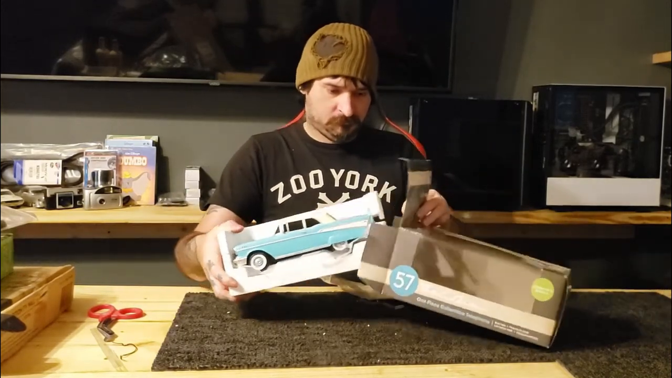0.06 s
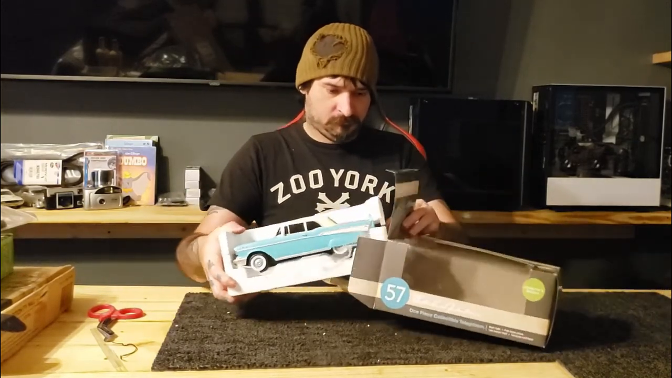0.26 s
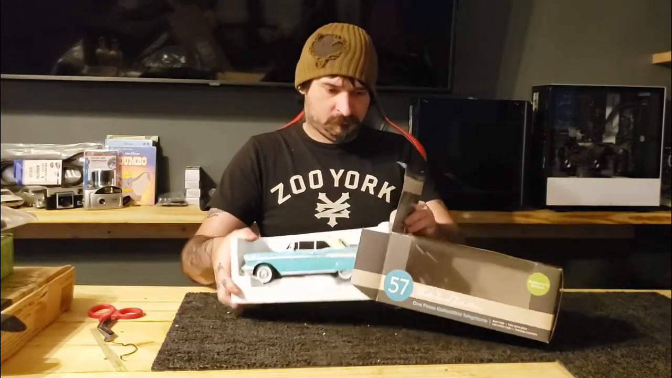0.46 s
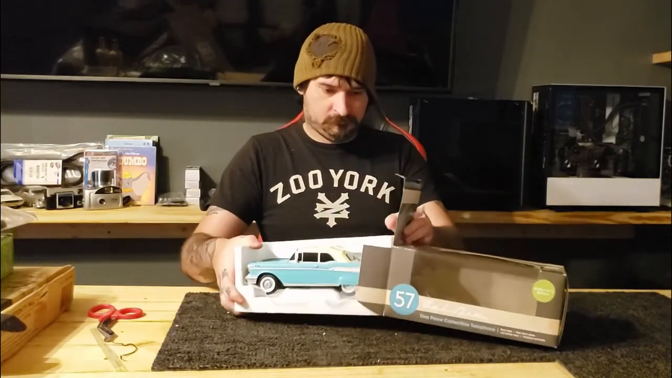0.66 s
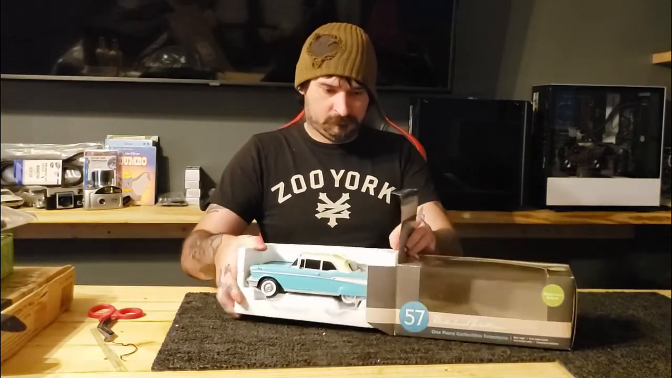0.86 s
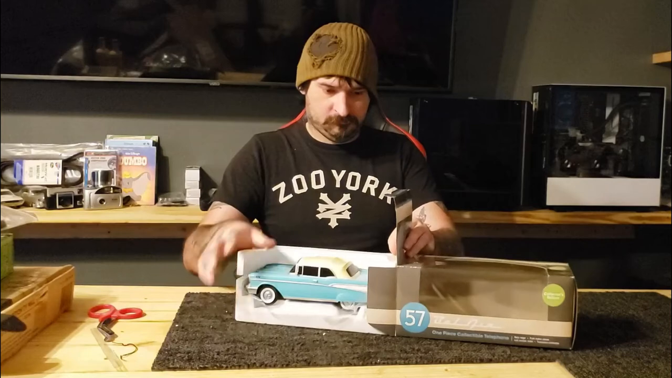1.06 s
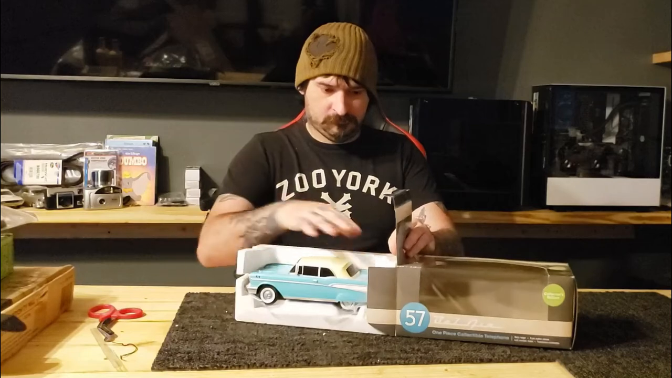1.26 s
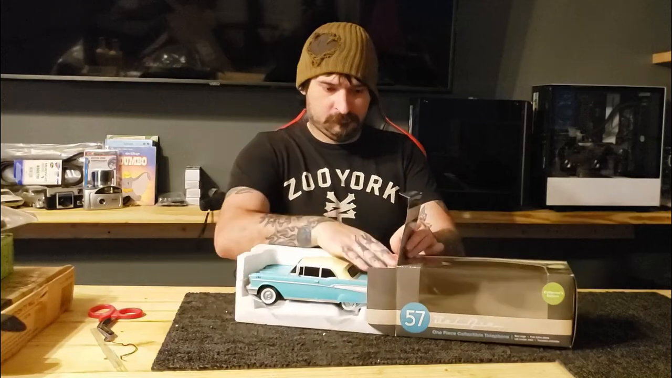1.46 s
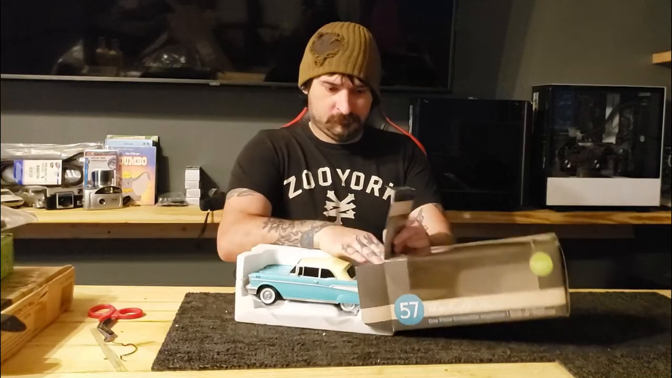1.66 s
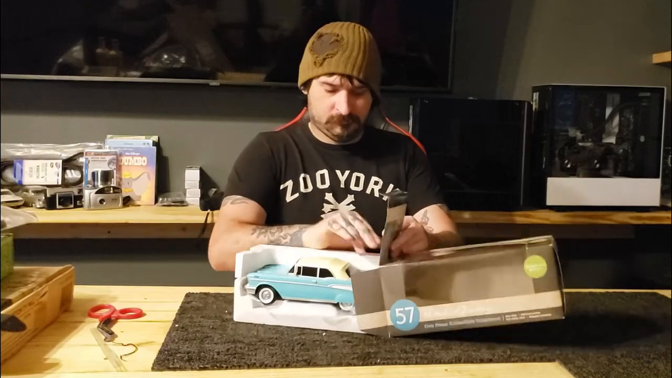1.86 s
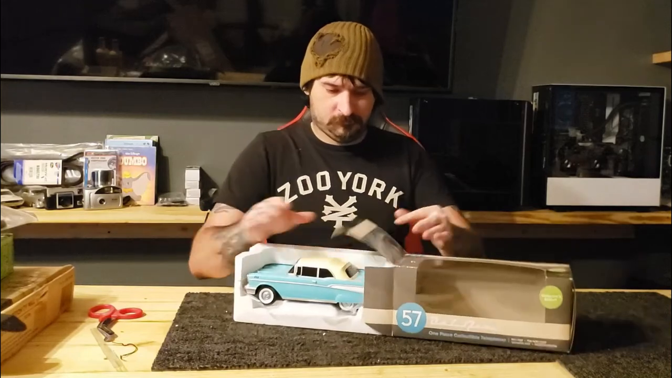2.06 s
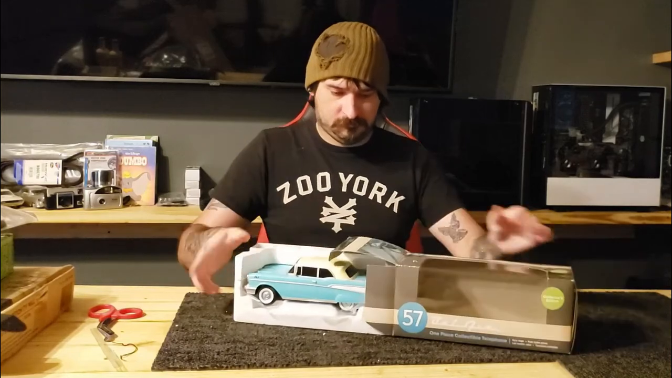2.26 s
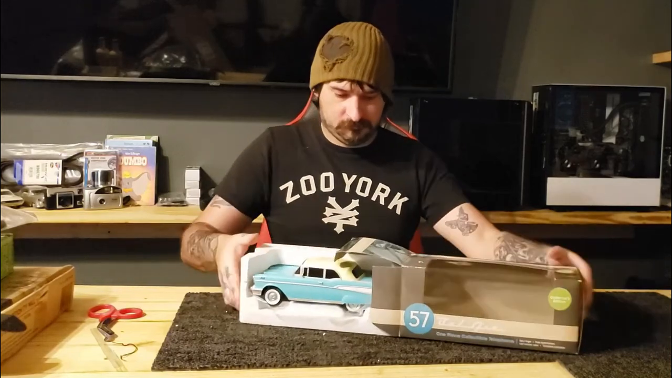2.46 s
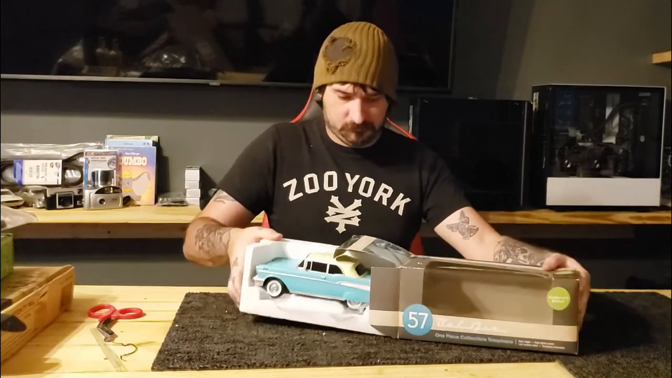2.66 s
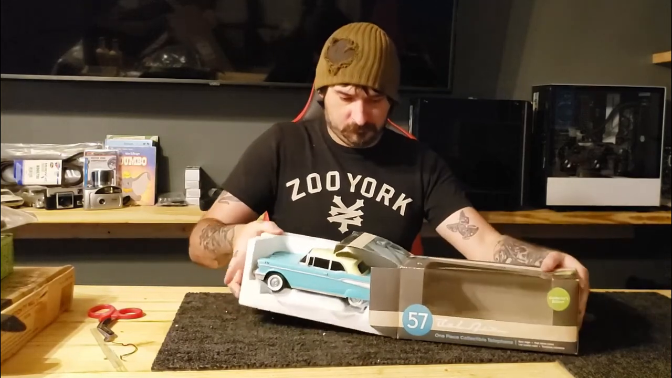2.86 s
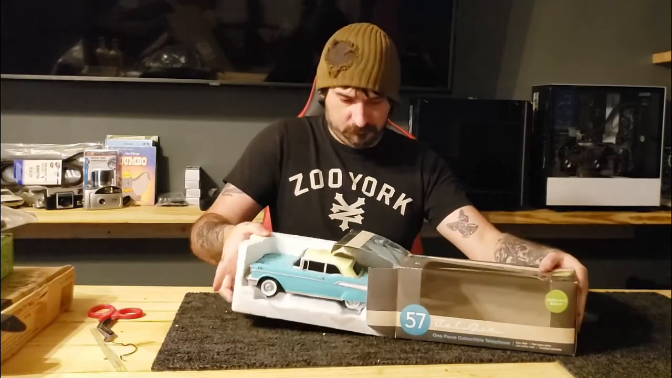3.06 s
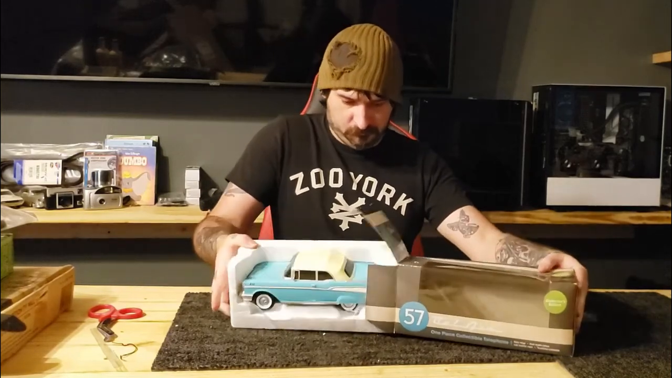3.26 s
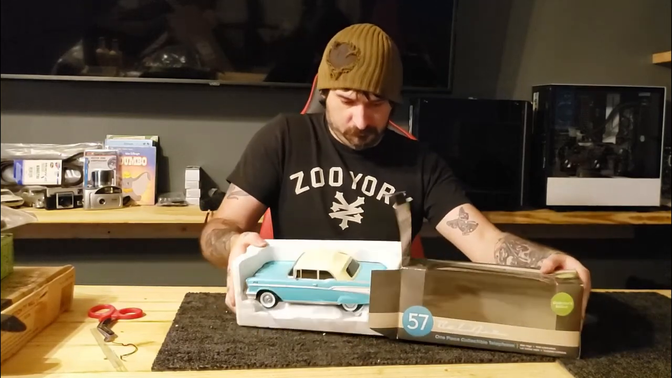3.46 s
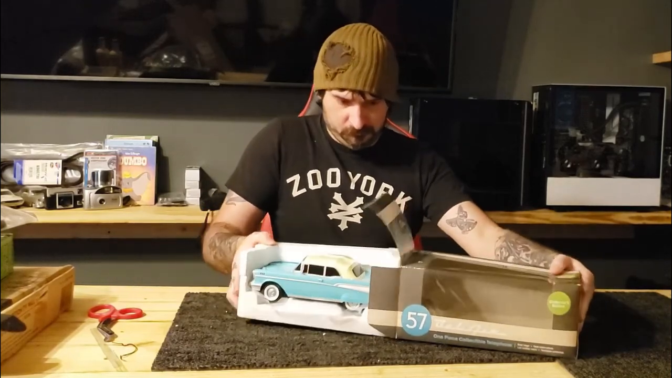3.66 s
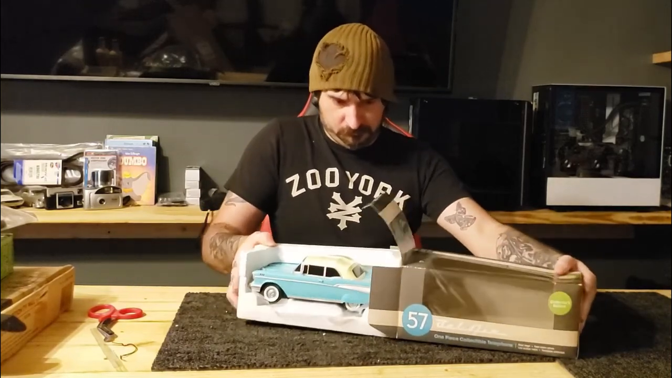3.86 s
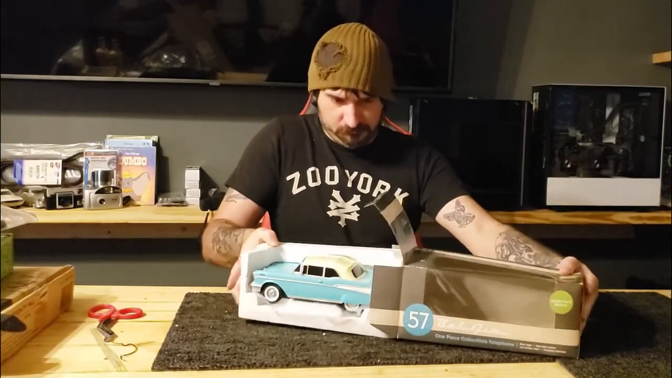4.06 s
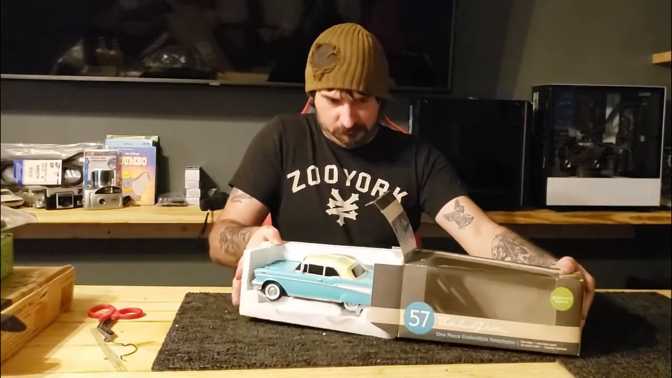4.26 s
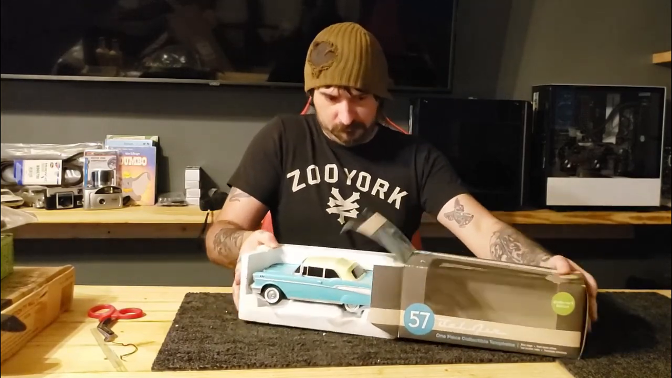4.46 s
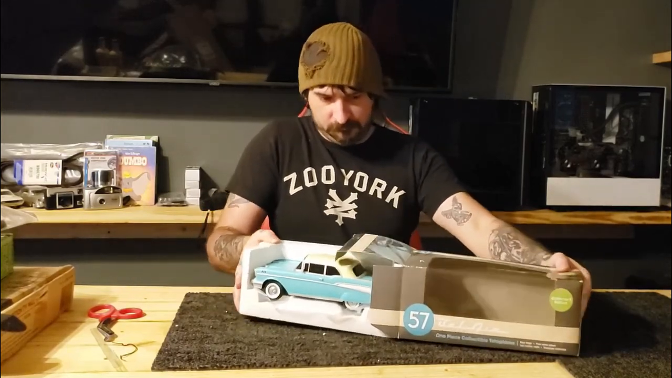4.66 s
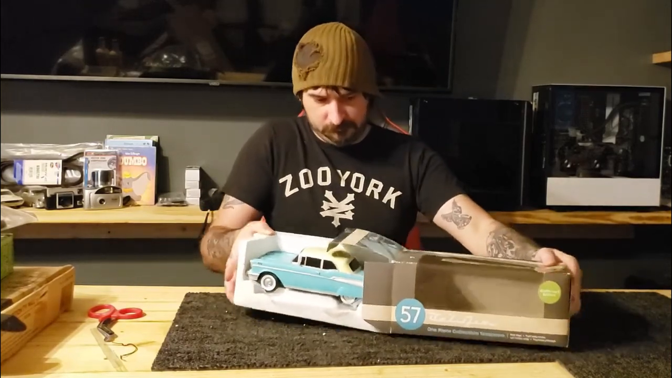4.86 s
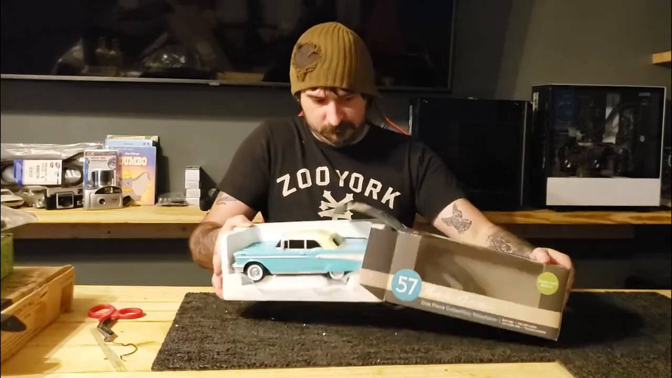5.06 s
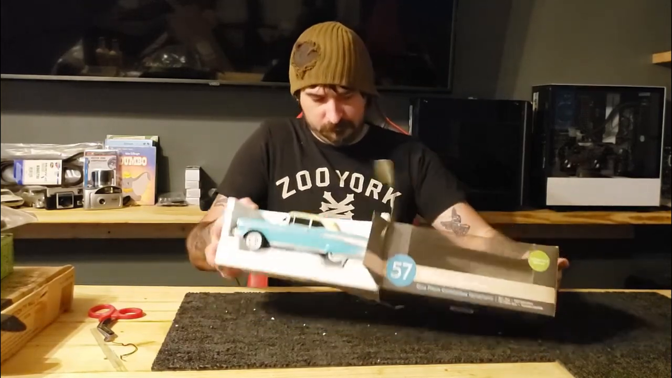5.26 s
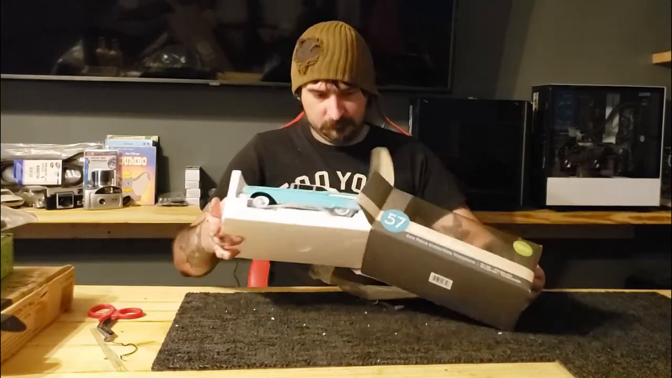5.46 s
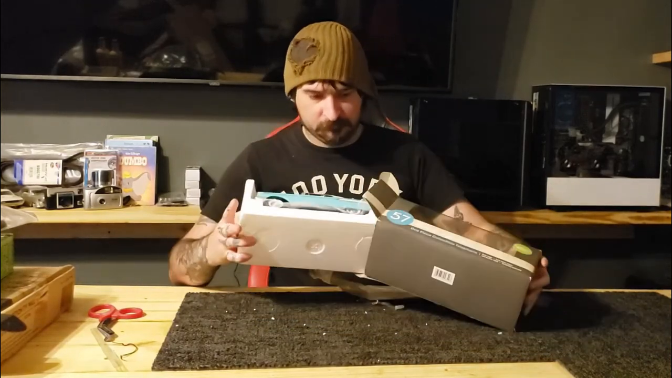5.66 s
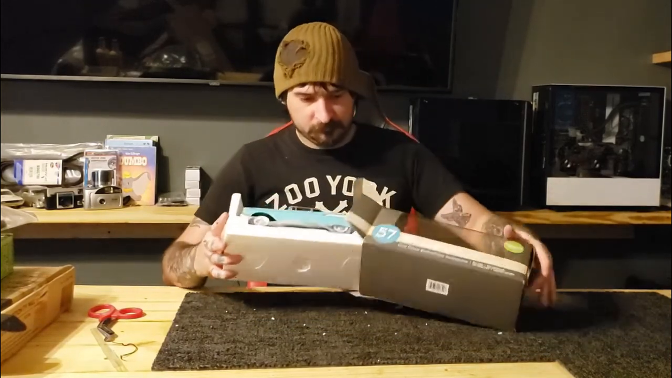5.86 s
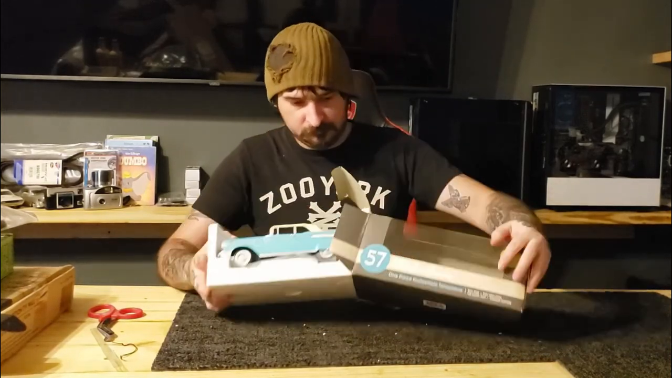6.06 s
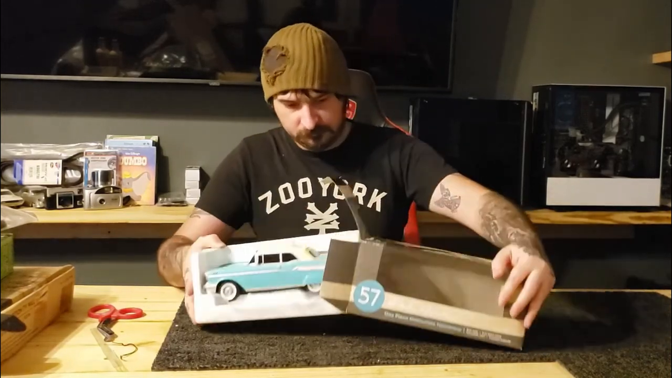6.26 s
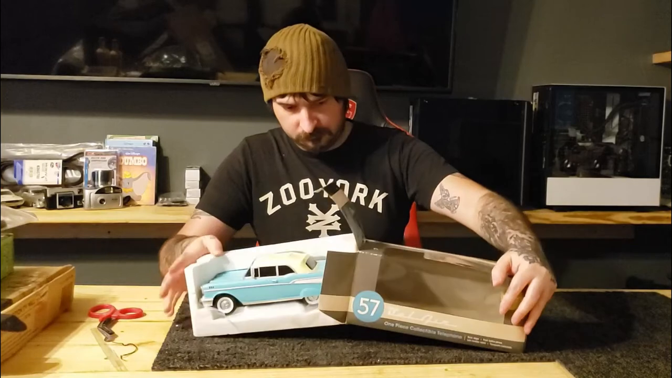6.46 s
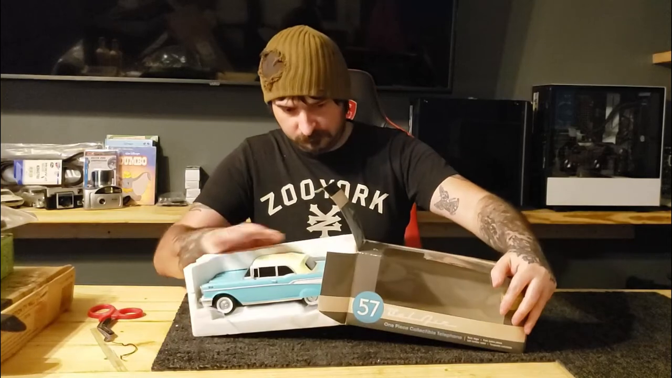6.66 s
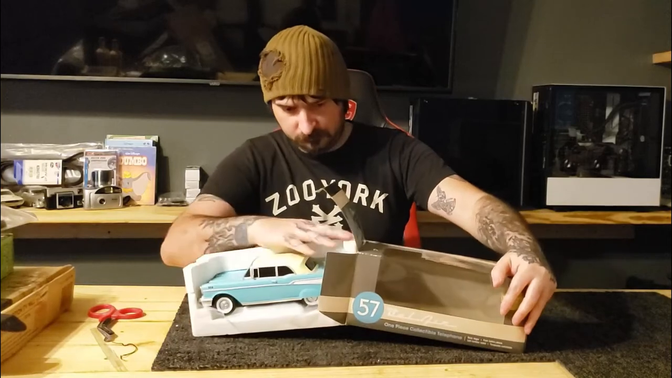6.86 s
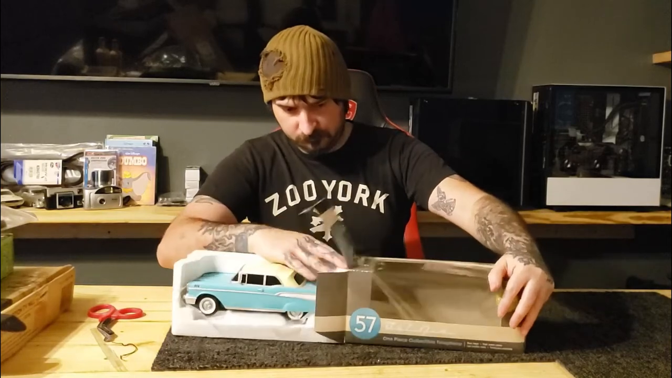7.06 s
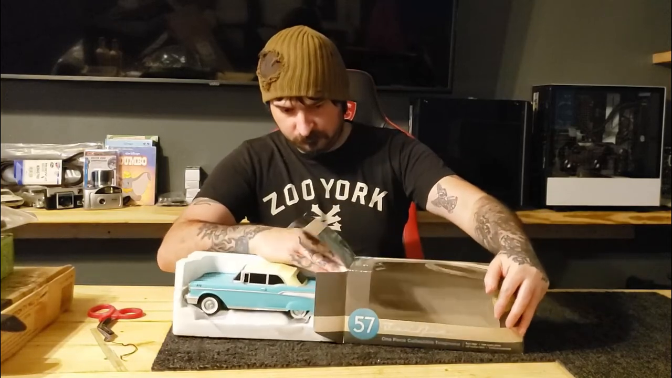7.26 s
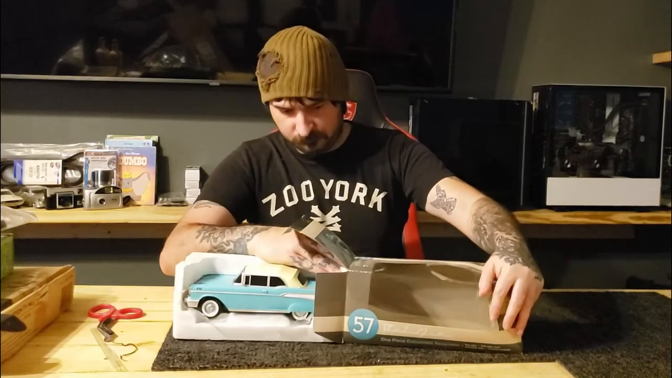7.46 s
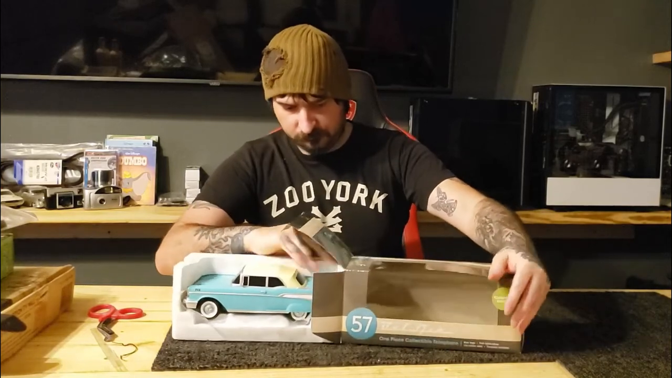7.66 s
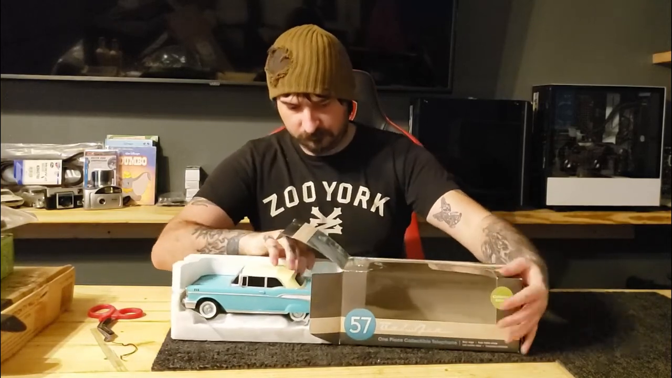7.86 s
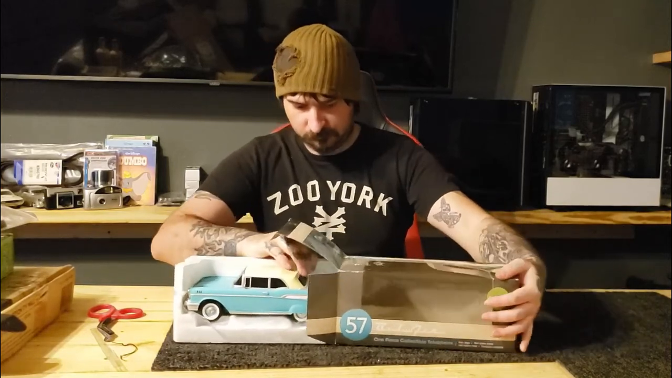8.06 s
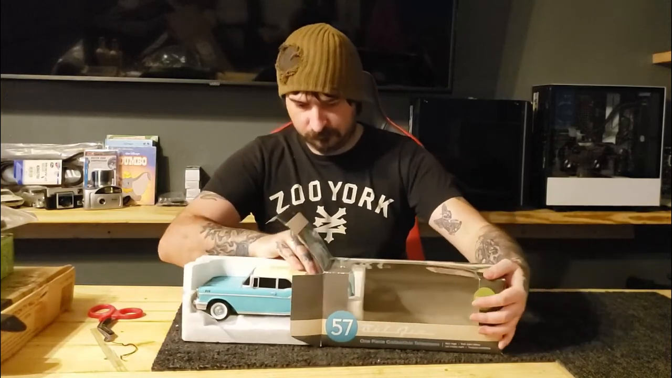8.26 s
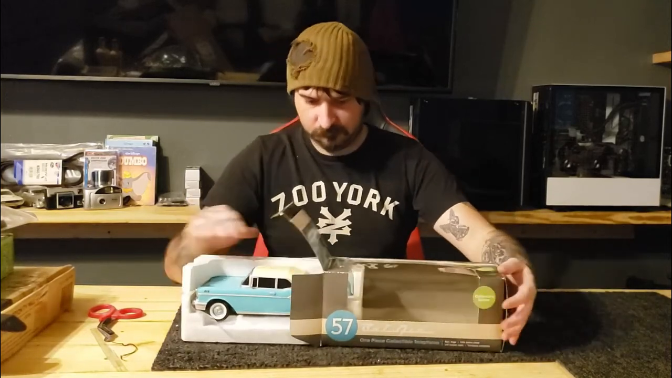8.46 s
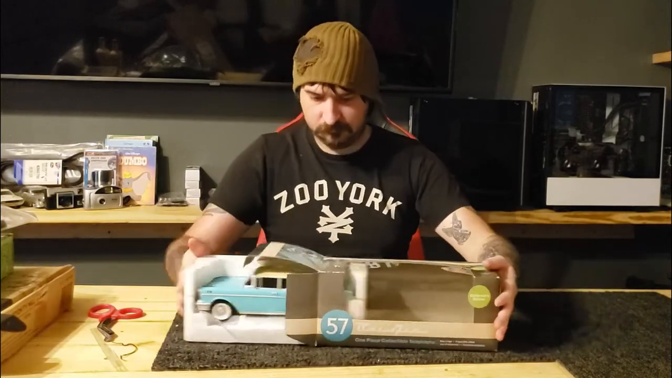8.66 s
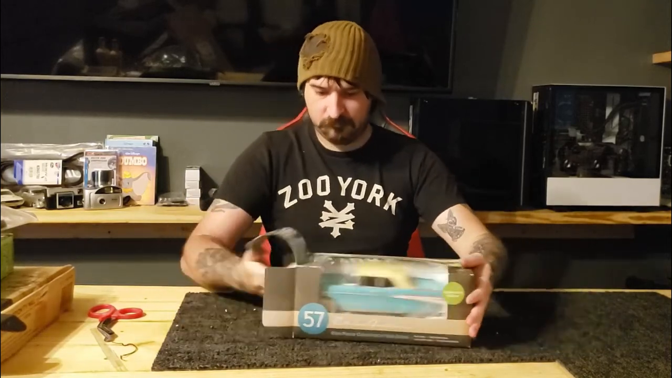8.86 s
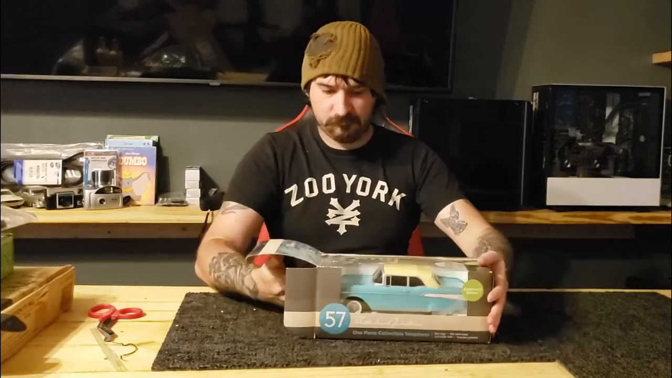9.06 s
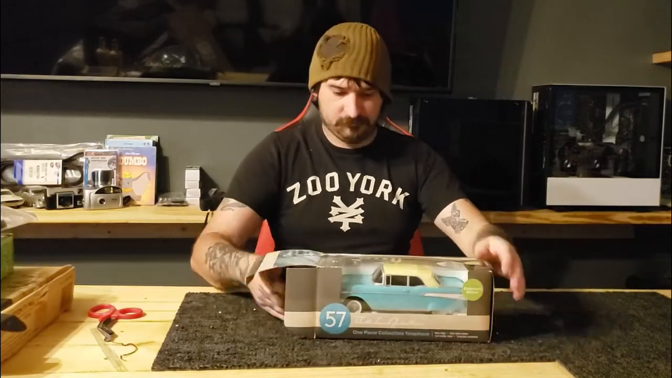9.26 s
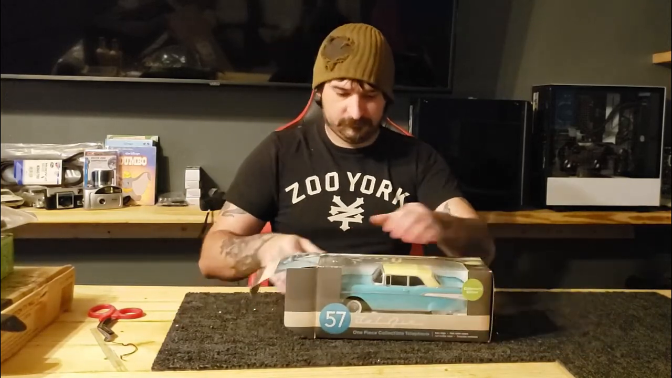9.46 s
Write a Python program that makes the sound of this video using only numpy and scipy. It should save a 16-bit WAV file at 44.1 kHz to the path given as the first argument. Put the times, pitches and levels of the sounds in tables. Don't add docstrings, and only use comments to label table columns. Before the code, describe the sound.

A close stereo pickup in a small hard room, with soft mains hum and low ventilation throughout. From 0 to 1.5 s, hands brush card and foam, with a light knock at 0.15, faint ticks and gentle dragging. Around 1.6 to 2.3 s the box jolts: hollow knocks, a dull card crunch and a low boom at 2.1. A firm dull tap lands at 2.9, then scrapes and small squeaks until 3.8, with taps near 3.9 and 4.2. At 4.6 a flap slaps sharply; at 5.25 several hollow thuds, then rustling and scraping, quieter around 6 to 7. From 7.1 to 7.8 come knocks, booms, crunches and short drags. A bright slap at 8.35 precedes a quick rasping slide from 8.7, climaxing in the loudest crunching knocks at 8.9 to 9.1. A squeaky tap at 9.15, then it settles to hum.

```python
import sys
import numpy as np
from scipy import signal
from scipy.fft import rfft, irfft, next_fast_len
from scipy.io import wavfile
from scipy.ndimage import uniform_filter1d

SR = 44100
rng = np.random.default_rng(int(sys.argv[2]) if len(sys.argv) > 2 else 0)


def volts_from_decibels(level):
    exponent = np.asarray(level, float) / 20
    return 10 ** exponent


def transcribe(signal):
    frames = np.atleast_2d(signal).T
    limited = np.clip(frames, -1, 1)
    pcm = np.round(limited * 32767).astype(np.int16)
    wavfile.write(sys.argv[1], SR, pcm)


N = 419391
CARD_TOP_HZ = 2710

# frequency [Hz], level [dB per Hz].
BRUSH_SPECTRUM = [(2500, 5.5), (3500, 2), (5000, 3), (7000, 3.5), (8500, -4), (11000, -1.5), (15800, -25.5)]
# frequency [Hz], level [dB per Hz].
FIZZ_SPECTRUM = [(6000, -41.5), (8500, -7.5), (9800, 2.5), (11500, 5), (14000, 1), (15800, -1.5)]


def evened(x):
    return x / np.sqrt(np.mean(x ** 2) + 1e-20)


def read(points, hz):
    f, value = np.transpose(points)
    return np.interp(np.log(hz + 1), np.log(f + 1), value)


def add(mix, start_s, sound):
    part = mix[round(start_s * SR):][:len(sound)]
    part += sound[:len(part)]


def colour(x, points):
    gain_db = np.maximum(read(points, abs(np.fft.fftfreq(2048, 1 / SR))), -90)
    log_gain = np.log(volts_from_decibels(gain_db))
    taps = np.fft.ifft(np.exp(np.conj(signal.hilbert(log_gain)))).real[:1024]
    taps = taps.reshape((1,) * (x.ndim - 1) + (-1,)) / np.linalg.norm(taps)
    return signal.oaconvolve(x, taps, axes=-1)[..., :x.shape[-1]]


def ring(x, hz, width_hz):
    return signal.lfilter(*signal.iirpeak(hz, hz / width_hz, SR), x)


def ring_twice(x, hz, width_hz):
    return ring(ring(x, hz, width_hz), hz, width_hz)


def dulled(x, top_hz):
    return signal.sosfilt(signal.butter(4, top_hz, fs=SR, output="sos"), x)


def box(x):
    # pitch [Hz], width [Hz], level [dB].
    panels = [(147.5, 34, -3.5), (206, 90.5, 1), (266, 111, -1.5), (345, 28.3, 3), (423, 33, 0),
              (481.5, 35, -2), (538.4, 54, -1.5), (686, 107, -7.5), (739.4, 62, -5), (881, 44, -10.5),
              (1004, 37, -12), (1152, 125, -16), (1334, 150, -15), (1692, 77, -20), (1820, 90, -19)]
    return sum((-1) ** k * volts_from_decibels(db) * ring(x, hz, width_hz) for k, (hz, width_hz, db) in enumerate(panels))


def slips(per_s, spread_db, smooth, lumps_db, same):
    clicks = (rng.random(N) < per_s / SR) * volts_from_decibels(spread_db * np.minimum(rng.exponential(1, N), 4))
    lumps = evened(uniform_filter1d(uniform_filter1d(rng.standard_normal(N), 500), 500))
    a, b = rng.standard_normal((2, N))
    ports = np.array([a, same * a + np.sqrt(1 - same ** 2) * b])
    return (evened(clicks) + smooth) * volts_from_decibels(lumps_db * lumps) * ports


def strokes(rows, rise_db_per_s, release_db_per_s):
    start_s, hold_s, *layers_db = np.transpose(rows)
    t = np.arange(0, N + 256, 128)[:, None] / SR
    rise_db = np.minimum(rise_db_per_s * (t - start_s), 0)
    shape_db = np.minimum(rise_db, -release_db_per_s * (t - start_s - hold_s))
    powers = [(volts_from_decibels(shape_db + db) ** 2).sum(1) for db in layers_db]
    return np.array([np.interp(np.arange(N) / SR, t[:, 0], power) for power in powers])


def patches(depth_db):
    wander = rng.standard_normal(N // 3000 + 2)
    return volts_from_decibels(depth_db * np.interp(np.arange(N) / 3000, np.arange(len(wander)), wander))


def tray_on_card():
    # full contact from [s], hold [s], panel drag [dB], edge scrape [dB].
    quick_pushes = [(0.463, 0.36, -55.5, -58.5), (0.908, 0.012, -44, -50.5), (1.537, 0.061, -50, -58.5),
                    (1.652, 0.03, -42, -69), (3.123, 0.032, -46.5, -51.5), (3.177, 0.11, -46.5, -46.5),
                    (3.45, 0.078, -43, -51.5), (3.768, 0.0076, -37, -44), (3.946, 0.041, -49.5, -83),
                    (4.305, 0.012, -48.5, -60.5), (4.584, 0.0067, -90, -46.5), (5.232, 0.017, -42.5, -43.5),
                    (5.5, 0.12, -46.5, -48.5), (5.933, 0.062, -44.5, -51.5), (6.053, 0.89, -60.5, -67),
                    (6.204, 0.022, -49, -60), (6.453, 0.098, -52, -61), (7.105, 0.058, -47.5, -46),
                    (7.31, 0.074, -46, -51.5), (7.48, 0.01, -40, -50.5), (7.75, 0.011, -33.5, -44.5),
                    (8.152, 0.059, -41.5, -70), (8.372, 0.0047, -43, -54), (8.512, 0.035, -47.0, -63),
                    (8.706, 0.04, -40.5, -60), (8.743, 0.33, -36.5, -46.5), (7.688, 0.03, -40, -66),
                    (7.17, 0.046, -36.5, -58), (1.96, 0.051, -43, -73), (8.95, 0.06, -50, -41),
                    (2.578, 0.066, -38.5, -61), (3.24, 0.04, -43, -60), (1.64, 0.043, -48, -63),
                    (9.16, 0.044, -45.5, -70)]
    # full contact from [s], hold [s], panel drag [dB], edge scrape [dB].
    slow_slides = [(0.18, 0.46, -53.5, -82), (0.907, 0.15, -53, -56.5), (1.617, 0.44, -49.5, -78),
                   (1.781, 0.1, -90, -49.5), (2.534, 0.16, -47, -90), (2.609, 0.38, -47, -54.5),
                   (3.248, 0.43, -55, -57), (3.359, 0.022, -40, -43), (4.116, 0.045, -42, -56),
                   (4.529, 0.24, -46, -56), (4.903, 0.41, -49.5, -54.5), (5.375, 0.31, -47.5, -59),
                   (5.913, 0.19, -51, -66), (6.958, 0.58, -65, -58), (7.745, 0.023, -43, -57),
                   (8.077, 0.31, -47.5, -50), (8.956, 0.044, -31, -45), (9.294, 0.037, -61, -68)]
    # frequency [Hz], level [dB per Hz].
    scrape_spectrum = [(350, -19), (600, 2.5), (896, 1.5), (1180, 1.5), (1590, -0.5), (2100, -5.5),
                       (3440, -10.5), (7000, -55), (15400, -120)]
    # pitch [Hz], width [Hz], level [dB].
    edge_modes = [(1510, 330, 5), (2210, 190, -4), (3690, 190, -9), (4560, 400, -19)]
    slide_power = strokes(slow_slides, 124, 140)
    dragging, scraping = np.sqrt(strokes(quick_pushes, 470, 550) + slide_power)
    sliding = np.sqrt(slide_power[1])
    scraping_fast = sliding * (sliding / volts_from_decibels(-40.5)) ** 2.3

    drag_slips = slips(per_s=600, spread_db=2.0, smooth=0.4, lumps_db=2.5, same=0.94)
    drag = evened(dulled(box(drag_slips), 4600))
    grit = slips(per_s=1200, spread_db=3.0, smooth=0.75, lumps_db=1.9, same=0.38)
    sing = sum(volts_from_decibels(db) * patches(depth_db=9.0) * ring(grit, hz, width_hz) for hz, width_hz, db in edge_modes)
    scrape = evened(evened(colour(grit, scrape_spectrum)) + 0.58 * evened(sing))
    rasp = evened(ring_twice(grit, 3700, 1600))

    out = crunches(grit) + squeaks(grit)
    out = out + volts_from_decibels(-3.5) * scraping_fast * rasp
    out = out + volts_from_decibels(2.0) * dragging * drag
    return out + volts_from_decibels(4.5) * scraping * scrape


def crunches(grit):
    # full contact from [s], hold [s], dull crunch [dB], sharp crunch [dB].
    jams = [(0.112, 0.08, -63, -60), (0.92, 0.028, -59, -57), (1.03, 0.02, -58, -57),
            (1.78, 0.046, -55, -58), (1.865, 0.03, -55, -56), (2.113, 0.047, -36.5, -67),
            (2.232, 0.025, -41.5, -55), (3.23, 0.061, -53, -60), (3.34, 0.07, -60, -57),
            (3.725, 0.01, -55, -53), (5.45, 0.21, -71, -57.5), (7.308, 0.055, -55, -46.5),
            (7.535, 0.02, -45, -48), (7.685, 0.029, -52, -70), (8.25, 0.06, -61, -55),
            (8.81, 0.12, -60, -48.5), (8.975, 0.018, -26.5, -36), (9.02, 0.045, -37, -42),
            (9.17, 0.035, -55, -56)]
    dull, sharp = np.sqrt(strokes(jams, 1200, 390))
    bands = ((dull, 1050), (sharp, 2140))
    return sum(level * evened(dulled(ring_twice(grit, hz, 1100), CARD_TOP_HZ)) for level, hz in bands)


def squeaks(grit):
    # full contact from [s], hold [s], level [dB], pitch [Hz].
    singing_slips = [(1.702, 0.028, -54, 1350), (3.125, 0.17, -53, 1520), (3.35, 0.05, -56, 3500),
                     (5.07, 0.14, -61, 3550), (3.35, 0.037, -51, 1620), (3.615, 0.025, -49.5, 1890),
                     (3.72, 0.01, -50, 1600), (5.144, 0.07, -56, 1530), (5.44, 0.06, -63, 1600),
                     (7.32, 0.06, -51.5, 2540), (7.535, 0.03, -49.5, 3190), (7.48, 0.02, -54, 2300),
                     (9.157, 0.043, -43, 1320), (9.182, 0.03, -62, 2570), (9.418, 0.056, -62, 990)]
    out = 0
    for start_s, hold_s, db, hz in singing_slips:
        tone = ring(ring(grit, hz, hz / 14), hz, hz / 3)
        out = out + np.sqrt(strokes([(start_s, hold_s, db)], 910, 780)) * evened(tone)
    return out


def hands():
    # full contact from [s], hold [s], skin brush [dB], foam fizz [dB].
    quick_grips = [(0.011, 0.18, -67, -65.5), (0.266, 0.056, -65, -67), (0.461, 0.077, -65, -60.5),
                   (1.523, 0.046, -61.5, -60), (1.732, 0.116, -68.8, -66.5), (1.865, 0.069, -58, -56.5),
                   (2.056, 0.086, -62.5, -68), (2.231, 0.033, -68, -77), (2.485, 0.13, -71.5, -69),
                   (2.704, 0.076, -57.5, -63.5), (3.123, 0.23, -64.5, -69.5), (4.517, 0.22, -66, -67.5),
                   (5.084, 0.077, -56, -57), (5.454, 0.16, -56, -62.5), (5.941, 0.085, -56.5, -58.5),
                   (6.089, 0.179, -77, -75), (6.635, 0.32, -63.5, -57.5), (7.14, 0.01, -44.5, -44),
                   (7.31, 0.05, -60.5, -66), (7.75, 0.017, -70, -56.5), (7.971, 0.11, -60.5, -63.5),
                   (8.484, 0.027, -63.5, -74), (8.685, 0.18, -77, -73), (8.753, 0.15, -53, -54),
                   (8.92, 0.071, -51, -51)]
    # full contact from [s], hold [s], skin brush [dB], foam fizz [dB].
    slow_sweeps = [(0.283, 0.37, -68, -73.5), (0.708, 0.081, -73, -76.1), (0.958, 0.21, -61, -60.5),
                   (1.544, 0.594, -69.5, -70), (2.885, 0.01, -68, -64), (3.309, 0.2, -60, -63),
                   (3.618, 0.16, -58.5, -61.5), (4.164, 0.064, -66.5, -67), (4.892, 0.74, -65.5, -69.5),
                   (5.234, 0.0086, -53.5, -54.5), (6.484, 0.034, -59.5, -59), (7.148, 0.0078, -50.5, -53.5),
                   (7.39, 0.2, -78, -73.5), (7.802, 0.021, -64.5, -63), (8.247, 0.077, -54.5, -55.5),
                   (8.89, 0.012, -55, -53)]
    brushing, fizzing = np.sqrt(strokes(quick_grips, 730, 260) + strokes(slow_sweeps, 162, 162))
    skin = slips(per_s=3700, spread_db=3.5, smooth=1.8, lumps_db=1.5, same=0.084)
    brush = evened(colour(skin, BRUSH_SPECTRUM))
    fizz = evened(colour(skin, FIZZ_SPECTRUM))
    return volts_from_decibels(5.0) * brushing * brush + volts_from_decibels(8.0) * fizzing * fizz


def knocks():
    # start [s], peak [dB], panel pitch [Hz], corner re peak [dB], corner pitch [Hz].
    box_knocks = [(0.11, -31.5, 443, -34, 965), (1.635, -36, 480, -27, 800), (1.928, -19, 494, -35, 800),
                  (2.226, -22, 402, -13.5, 1230), (2.472, -38, 210, -29, 965),
                  (3.756, -30.5, 352, -3, 1120), (4.154, -29, 503, -13, 965), (4.519, -25, 344, -14, 965),
                  (4.895, -32, 365, -25, 965), (5.285, -32, 463, -19, 965), (7.401, -22.5, 241, -34, 965),
                  (7.531, -19.5, 370, -10.5, 780), (8.802, -28, 300, -25, 965), (8.921, -26, 266, -13, 965),
                  (8.946, -22.5, 267, -10, 900), (8.985, -14, 537, -10.5, 1310), (9.017, -12, 417, -9, 960)]
    # start [s], peak [dB], panel pitch [Hz], corner re peak [dB].
    tray_taps = [
        (2.879, -14, 364, -44),
        (3.942, -44.5, 424, -10),
        (4.635, -23, 393, -7.5),
        (5.529, -26, 463, -20),
        (5.941, -24.5, 558, -22),
        (6.967, -35, 220, -19),
        (7.683, -27, 286, -14.5),
        (8.144, -27, 426, -24),
        (8.68, -25, 347, -26),
        (9.155, -37, 350, -6.5),
    ]
    # start [s], peak [dB], panel pitch [Hz], corner re peak [dB], corner pitch [Hz].
    soft_shoves = [(0.151, -20, 562, -20.5, 970), (0.548, -33, 345, -26, 1350),
                   (0.911, -36.5, 312, -11, 1010), (1.029, -43, 244, -12, 974),
                   (1.535, -41.5, 241, -17, 1270), (2.105, -16.5, 570, -14.5, 1010),
                   (2.571, -24, 355, -22, 1020), (5.238, -19, 514, -26, 1610),
                   (6.507, -27.5, 209, -26, 1290), (7.128, -18, 510, -17.5, 1040),
                   (9.033, -23, 410, -7.5, 1590), (9.408, -59, 244, -3, 931)]
    knock_ms, shove_ms, tray_corner_hz = 8.07, 15.1, 1350
    rows = [(*k, knock_ms) for k in box_knocks]
    rows += [(*k, tray_corner_hz, knock_ms) for k in tray_taps]
    rows += [(*k, shove_ms) for k in soft_shoves]
    out, t = np.zeros(N), np.arange(9000) / SR
    for start_s, db, hz, corner_db, corner_hz, ms in rows:
        u = t / (ms / 1000)
        contact = np.exp(-u) * (1 - np.exp(-u / 0.71))
        rattle = (rng.random(len(t)) < 700 / SR) * rng.standard_normal(len(t)) * contact
        rattle[0] = -9 * np.exp(-ms / 3.8)
        blow = ring_twice(rattle, hz, 2.54 * hz)
        body = box(blow) + 1.46 * ring(blow, hz, 73)
        wide = ring(3 * rattle + 0.79 * rng.standard_normal(len(t)) * contact, corner_hz, 0.94 * corner_hz)
        corner = ring(wide, corner_hz, 0.32 * corner_hz) + 0.35 * ring(wide, corner_hz, 0.21 * corner_hz)
        body, corner = body / abs(body).max(), corner / abs(corner).max()
        add(out, start_s, volts_from_decibels(db) * (body + volts_from_decibels(corner_db + 7.5) * corner))
    return out


def blows():
    # start [s], peak [dB], pitch [Hz], decay [cycles].
    panel_blows = [(0.165, -23.5, 560, 2.2), (0.556, -29.5, 345, 2), (1.658, -35, 420, 2.2),
                   (1.936, -18, 353, 1.6), (2.106, -20.5, 467, 3), (2.113, -18.5, 330, 1.4),
                   (2.12, -13, 610, 1.2), (2.134, -18.5, 250, 1.4), (2.153, -19, 564, 2.9),
                   (2.126, -13, 620, 1.8), (2.145, -20.5, 523, 2.4), (2.234, -21.5, 418, 1.4),
                   (2.574, -34, 560, 2.2), (3.73, -35, 404, 1.5), (3.758, -23.5, 345, 3.3),
                   (3.78, -26.5, 378, 2.4), (3.808, -34, 370, 1.6), (4.155, -30, 600, 1.8),
                   (5.238, -18.5, 423, 1.6), (5.246, -18.5, 546, 3.8), (5.258, -16, 494, 1.9),
                   (5.288, -18.5, 466, 3.8), (5.31, -26, 476, 3.4), (4.534, -26, 400, 2.6),
                   (4.556, -30, 420, 1.8), (4.645, -22, 1300, 1.3), (7.684, -27, 700, 2.7),
                   (8.681, -29.5, 477, 3.0), (5.564, -30.5, 431, 2.6), (6.553, -30.5, 440, 2.6),
                   (7.543, -21, 450, 1.3), (7.571, -25.5, 480, 2.6), (7.711, -25, 400, 1.5),
                   (8.145, -26.5, 600, 1.5), (8.163, -30, 480, 1.4), (8.179, -30, 452, 1.8),
                   (8.215, -33, 480, 1.8), (8.226, -35, 520, 1.5), (8.355, -27, 1600, 1.5),
                   (8.363, -26.5, 480, 1.5), (8.374, -30, 503, 2.2), (8.924, -21, 323, 2.4),
                   (8.947, -17, 950, 1.2), (8.985, -10, 500, 2.8), (9.0, -13, 800, 1.5),
                   (9.018, -9, 980, 1.6), (9.036, -15, 400, 2.8), (9.06, -18.5, 796, 1.5),
                   (9.156, -25.5, 1140, 3.7),
                   (0.153, -28.5, 560, 3), (1.637, -34, 700, 2), (4.156, -32.5, 1100, 1.5),
                   (7.432, -30, 230, 2), (7.447, -31, 210, 2), (7.532, -23, 900, 1.2),
                   (7.146, -17.5, 477, 1.7), (7.162, -19, 604, 1.5), (8.68, -35, 560, 2),
                   (8.698, -29, 430, 2), (8.714, -31, 480, 3), (8.747, -30, 420, 2), (8.76, -30, 330, 1.5),
                   (8.805, -27, 380, 1.5), (8.813, -25, 350, 2), (8.833, -25, 900, 1.2),
                   (8.872, -26, 330, 2), (8.928, -19, 300, 1.5), (8.972, -25, 1300, 2),
                   (8.979, -21, 1200, 2), (8.99, -12, 520, 1.5), (9.045, -17, 600, 1.3)]
    out, t = np.zeros(N), np.arange(3000) / SR
    for start_s, db, hz, cycles in panel_blows:
        u = t * hz
        shape = (1 - np.exp(-u / 0.18)) * np.exp(-1.5 * u / cycles)
        add(out, start_s, -volts_from_decibels(db + 4.5) * np.sin(2 * np.pi * u) * shape)
    return out


def slaps():
    # start [s], peak [dB], centre [Hz], fade [ms].
    flap_slaps = [
        (4.634, -18, 1940, 21.4),
        (7.531, -26, 2040, 21),
        (8.356, -17, 2680, 7.4),
        (8.946, -23.5, 2400, 6.6),
        (9.157, -45, 2390, 12),
        (2.113, -46, 1400, 12),
        (2.227, -32, 1950, 28),
    ]
    # frequency [Hz], level [dB per Hz].
    crack_spectrum = [(400, -43), (800, 16.5), (2600, 6.5), (3100, 4), (5000, 7), (8000, -54), (15500, -71)]
    out, t = np.zeros(N), np.arange(5000) / SR
    for start_s, db, hz, fade_ms in flap_slaps:
        shiver = 1.5 * rng.standard_normal(len(t)) * np.exp(-t / (fade_ms / 1000))
        shiver[0] = -6
        slap = colour(0.19 * shiver + ring(shiver, hz, 0.59 * hz), crack_spectrum)
        add(out, start_s, volts_from_decibels(db) * slap / abs(slap).max())
    return out


def ticks():
    # start [s], peak [dB], fade [ms].
    film_ticks = [(0.112, -39.5, 31), (0.2593, -50, 15), (0.4413, -46, 22), (0.4674, -34.5, 9.6),
                  (0.901, -45, 15), (1.015, -38, 17), (1.8667, -45, 21), (2.2313, -52, 15),
                  (2.701, -44, 15), (2.8795, -41, 15), (4.1974, -48, 15), (4.5115, -40, 15),
                  (4.6358, -29, 5.1), (5.456, -40, 13), (5.935, -35, 17), (7.1455, -36, 9.4),
                  (7.3096, -43, 15), (7.522, -35, 5), (7.747, -42, 12), (7.9703, -49, 15),
                  (8.3552, -30.5, 10), (8.6815, -49, 15), (8.737, -53, 15)]
    out, t = np.zeros(N), np.arange(5000) / SR
    for start_s, db, fade_ms in film_ticks:
        shape = np.exp(-t / 0.00051) + 0.13 * np.exp(-t / (fade_ms / 1000))
        add(out, start_s, volts_from_decibels(db - 1.5) * shape * rng.standard_normal(len(t)))
    return colour(out, BRUSH_SPECTRUM) + 0.74 * colour(out, FIZZ_SPECTRUM)


def thumps():
    # start [s], peak [dB], pitch [Hz].
    bench_thumps = [(0.167, -39, 68.4), (0.539, -34, 72), (0.946, -33, 58), (1.037, -43, 67),
                    (2.108, -29.5, 112.4), (2.147, -35, 92.5), (2.6, -38, 52.7), (3.477, -37.5, 99),
                    (3.738, -38, 67), (4.097, -35, 55.7), (4.529, -34, 75.4), (5.273, -37, 64.6),
                    (5.471, -32.5, 81), (5.946, -38, 54), (6.53, -44, 89), (7.181, -27, 51),
                    (6.58, -36, 60), (8.798, -34, 64.6), (8.978, -31, 63)]
    # start [s], peak [dB], pitch [Hz].
    air_booms = [
        (2.112, -24, 179),
        (7.14, -24, 268),
        (7.144, -29.5, 166),
        (5.245, -27, 201),
        (7.399, -24, 351),
        (7.42, -30, 177),
        (7.54, -35.5, 176),
        (9.02, -30, 161),
        (2.15, -36, 130),
        (8.987, -26.5, 280),
    ]
    out, t = np.zeros(N), np.arange(12000) / SR
    shape = (1 - np.exp(-t / 0.0091)) * np.exp(-t / 0.02)
    for start_s, db, hz in bench_thumps + air_booms:
        add(out, start_s, volts_from_decibels(db + 7) * np.sin(2 * np.pi * hz * t) * shape)
    return signal.sosfilt(signal.butter(2, 38, "high", fs=SR, output="sos"), out)


def paired(a, b, size):
    # frequency [Hz], left-right likeness [-1..1].
    likeness = [(150, 0.76), (400, 0.6), (1000, .5), (2500, -0.28), (8000, 0)]
    hz, _, z = signal.stft(np.array([a, b]), SR, nperseg=size)
    same = np.clip(read(likeness, hz), 0, 1)[:, None]
    return hz, np.array([z[0], same * z[0] + np.sqrt(1 - same ** 2) * z[1]])


def room(x):
    # frequency [Hz], t60 [s].
    decay_times = [(100, 0.26), (400, 0.37), (1500, 0.35), (4000, 0.35), (12000, 0.14)]
    out, turn = 0, 2 * np.pi * 2.3 * np.arange(N) / SR
    for k in range(3):
        taps = rng.choice([-1., 1.], (2, 22000)) * (rng.random((2, 22000)) < 0.1)
        taps[:, :130] = 0
        hz, z = paired(*taps, size=256)
        t = np.arange(z.shape[2]) * 128 / SR
        decay = volts_from_decibels(-60 * t / read(decay_times, hz)[:, None])
        tail = signal.istft(z * decay, SR, nperseg=256)[1]
        tail = tail / np.linalg.norm(tail[0])
        share = np.sqrt(2 / 3) * np.cos(turn + k * 2 * np.pi / 3)
        out = out + signal.oaconvolve((share * x)[None], tail, axes=1)[:, :N]
    return out


def air():
    # frequency [Hz], level [dB per Hz].
    air_spectrum = [(15, -36), (28, -16), (59, -0.5), (82, 4), (107, -7), (157, -10.5), (241, -8.5),
                    (342, -8.5), (542, -7), (654, -15.5), (1870, -34.5), (4450, -44.5), (11700, -46.5),
                    (15800, -35.5)]
    # harmonic number, level [dB rms].
    harmonics = [(1, -48.5), (2, -62.5), (3, -67.5), (4, -57.5), (5, -60.5), (10, -71)]
    mains_hz = 59.97
    hz, z = paired(*rng.standard_normal((2, N)), size=2048)
    wash = signal.istft(z * volts_from_decibels(read(air_spectrum, hz))[:, None], SR, nperseg=2048)[1][:, :N]
    t = np.arange(N) / SR
    hum = sum(volts_from_decibels(db + 4.0) * np.sin(2 * np.pi * (k * mains_hz * t + rng.random())) for k, db in harmonics)
    return volts_from_decibels(-52.5) * evened(wash) + hum


def scene():
    rub = tray_on_card() + hands()
    hits = dulled(knocks() + blows(), CARD_TOP_HZ) + slaps()
    snaps = ticks()
    direct = volts_from_decibels(-2.0) * rub + volts_from_decibels(-1.0) * hits + volts_from_decibels(-2.0) * snaps
    wet = room(volts_from_decibels(-6.5) * rub[0] + volts_from_decibels(-6.5) * hits + volts_from_decibels(4.0) * snaps)
    return direct + wet + thumps() + air()


def roll_off(x):
    return signal.sosfilt(signal.butter(12, 16480, fs=SR, output="sos"), x)


def record(dry):
    # frequency [Hz], left over right [dB].
    left_over_right = [(100, -0.7), (700, 0), (1200, -1), (2000, -3), (3300, 1), (4500, 5), (5500, 11),
                       (7000, 31), (8600, 47), (10000, 26), (12000, 12), (15000, 3)]
    right_lag_samples, edge_hz = 4, 15840
    size = next_fast_len(N + 4096)
    hz = np.fft.rfftfreq(size, 1 / SR)
    over = volts_from_decibels(read(left_over_right, hz))
    left = np.sqrt(2) * over / np.sqrt(1 + over ** 2) * (hz < edge_hz)
    right = left / over * np.exp(-2j * np.pi * hz * right_lag_samples / SR)
    mix = irfft(rfft(dry, size) * np.array([left, right]), size)[:, :N]
    return roll_off(mix)


dry = scene()
out = record(dry)
transcribe(out)
```